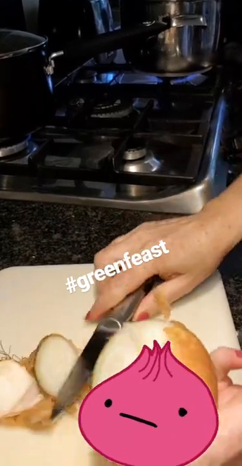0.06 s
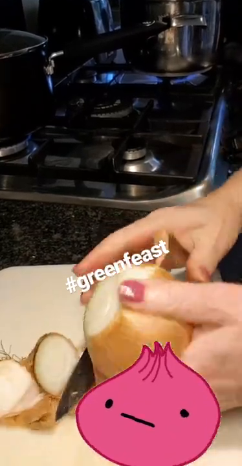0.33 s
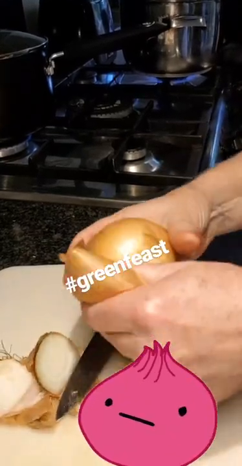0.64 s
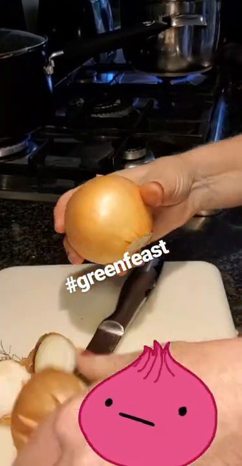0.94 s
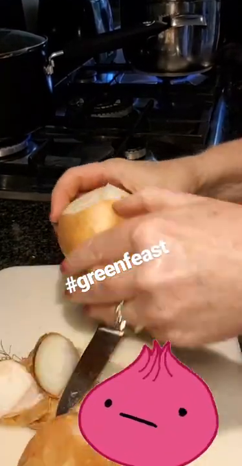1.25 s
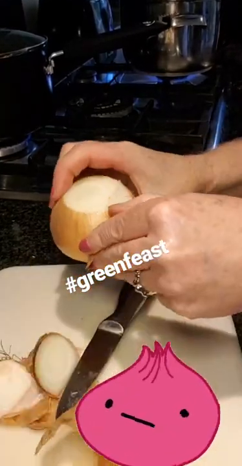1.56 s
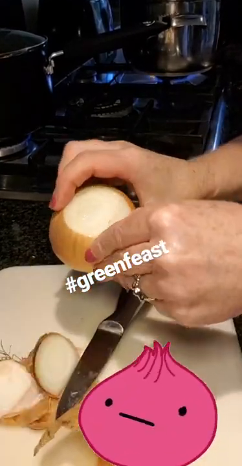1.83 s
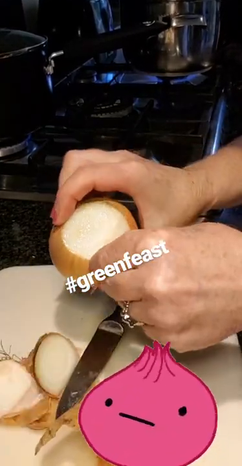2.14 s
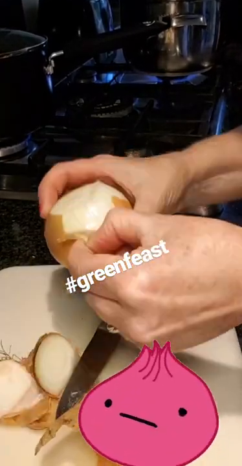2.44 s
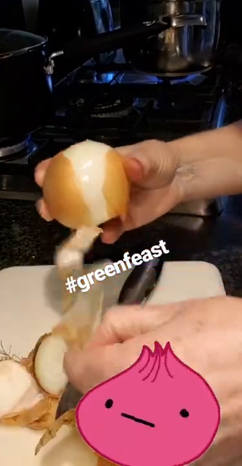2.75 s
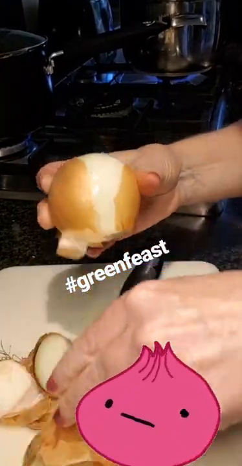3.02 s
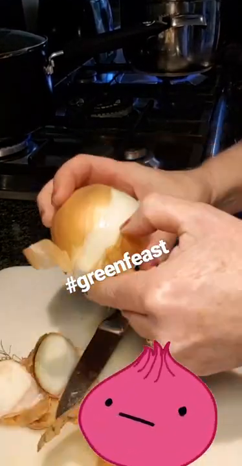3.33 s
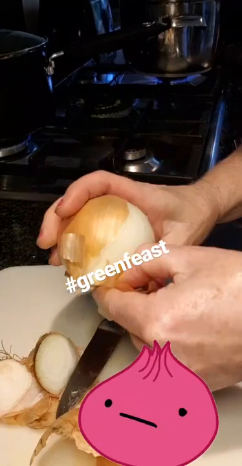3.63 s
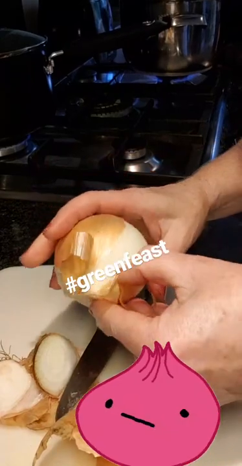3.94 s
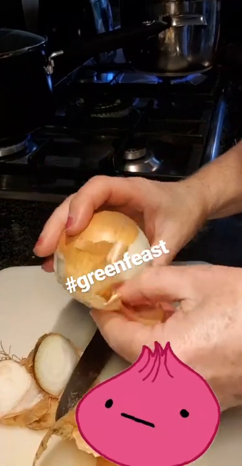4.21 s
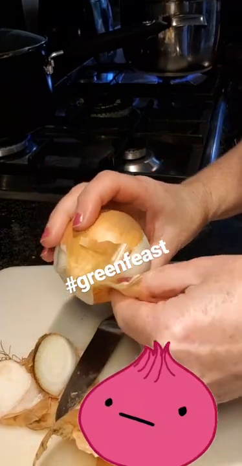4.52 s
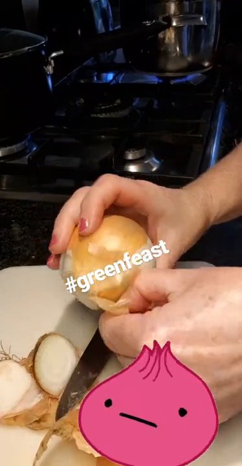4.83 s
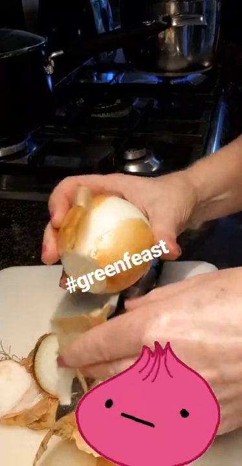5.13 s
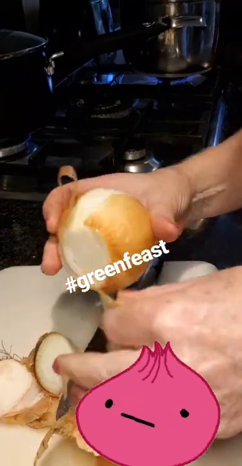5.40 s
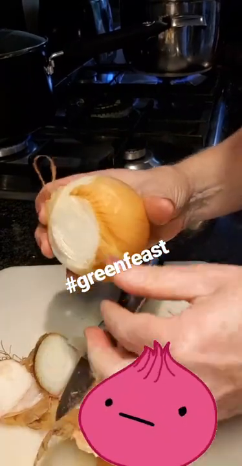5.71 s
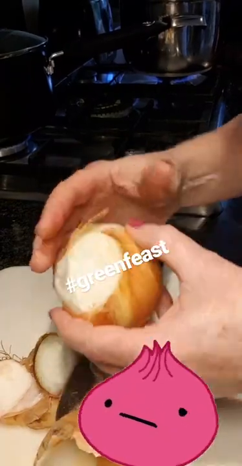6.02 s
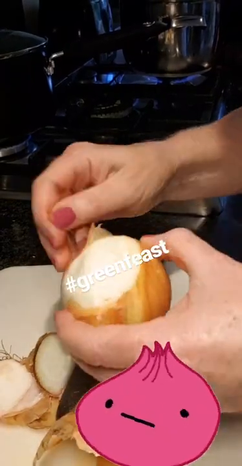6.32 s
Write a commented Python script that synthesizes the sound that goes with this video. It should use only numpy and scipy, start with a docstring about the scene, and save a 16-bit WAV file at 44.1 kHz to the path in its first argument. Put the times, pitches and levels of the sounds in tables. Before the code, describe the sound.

Close to the microphone in a kitchen, a knife knocks once on a chopping board, which rings briefly. Right after, dry onion skin snaps and crinkles under the fingers and a strip tears off. A second strip rips away a little later, followed by scattered crisp crackles. Things clack farther off, echoing in the room, while a faint appliance hum and hiss gradually grow louder.

```python
"""A knife knocks once on a kitchen chopping board, close to a two-port microphone, and the board rings.
Just as near, an onion is peeled: its dry skin snaps, crinkles under the fingers and is torn off in
two strips, fibre by fibre. Things clack farther off in the room, mostly heard as reverberation.
An appliance's steady hum and hiss are heard faintly after the knock, then gradually come up in level."""
import sys
import numpy as np
from scipy import signal
from scipy.fft import rfft, irfft, next_fast_len
from scipy.io import wavfile

SR = 44100
rng = np.random.default_rng(int(sys.argv[2]) if len(sys.argv) > 2 else 0)


def dump_mix(stems):
    """Bounce the given channels to the path in sys.argv[1] as a 16-bit WAV at rate SR."""
    frames = np.atleast_2d(stems).T  # one column per channel
    limited = np.clip(frames, -1, 1)  # hard clip at full scale
    pcm = np.round(limited * 32767).astype(np.int16)
    wavfile.write(sys.argv[1], SR, pcm)


N = 289296


def from_db(db):
    """Decibels to gain."""
    return 10 ** (np.asarray(db) / 20)


def rms_one(x):
    """Scale to rms 1."""
    return x / np.sqrt(np.mean(x ** 2) + 1e-20)


def unit_energy(x):
    """Scale each channel to energy 1."""
    return x / np.sqrt(np.sum(x ** 2, axis=-1, keepdims=True) + 1e-20)


def at_hz(points, hz):
    """Read a table on a log-frequency axis."""
    f, value = np.transpose(points)
    return np.interp(np.log(np.maximum(hz, 1)), np.log(f), value)


def add(out, s, sound):
    """Mix a sound in at s seconds."""
    i = max(int(s * SR), 0)
    out[:, i:i + sound.shape[-1]] += sound[..., :N - i]


def panned(level_db, pan_db):
    """Left and right gains; positive pan_db is to the left."""
    return from_db(level_db + pan_db / 2 * np.array([[1], [-1]]))


def drift(per_s):
    """A smooth random curve of rms 1."""
    knots = rng.standard_normal(int(N / SR * per_s) + 2)
    return rms_one(np.interp(np.arange(N) / SR * per_s, np.arange(len(knots)), knots))


def burst(t60, size=SR // 30):
    """Stereo noise that starts at once and dies."""
    return rng.standard_normal((2, size)) * from_db(-60 * np.arange(size) / SR / t60)


def stroke(start, end, attack_s, release_db_per_s):
    """Gain of one hand movement: attack, hold, release."""
    t = np.arange(N) / SR
    attack = np.clip((t - start) / attack_s, 0, 1)
    return attack * from_db(-release_db_per_s * np.maximum(t - end, 0))


# The microphone's two ports. Each row: frequency in Hz, correlation of left and right.
PORT_LIKENESS = [(60, .99), (290, 0.84), (640, 0.52), (1400, -0.17), (3100, 0.044), (7000, -0.0087),
                 (15000, 0.0043)]

def at_ports(pair, hz):
    """Two unrelated signals become left and right: alike in the bass, apart in the treble."""
    alike = at_hz(PORT_LIKENESS, hz)
    return np.sqrt(1 + alike) * pair[0] + np.sqrt(1 - alike) * pair[1] * [[1], [-1]]


def coloured(pair, spectrum, peaks=()):
    """Give a lasting stereo sound a spectrum and resonances; rms 1."""
    size = next_fast_len(N)
    hz = np.fft.rfftfreq(size, 1 / SR)
    peaks_db = sum(db / (1 + (2 * (hz - centre) / width) ** 2) for centre, width, db in peaks)
    shaped = at_ports(rfft(pair, size), hz) * from_db(at_hz(spectrum, hz) + peaks_db)
    return rms_one(irfft(shaped, size)[:, :N])


def dying_noise(spectrum, t60s, size=SR // 2):
    """Half-octave bands of stereo noise, each dying at its own rate; energy 1."""
    t, out = np.arange(size) / SR, 0
    edges = np.geomspace(125, 17000, 15)
    for low, high in zip(edges, edges[1:]):
        hz = np.sqrt(low * high)
        noise = rng.standard_normal((2, size)) * from_db(-60 * t / at_hz(t60s, hz))
        band = signal.sosfilt(signal.butter(2, [low, high], "band", fs=SR, output="sos"), noise)
        out += unit_energy(at_ports(band, hz)) * from_db(at_hz(spectrum, hz)) * np.sqrt(high - low)
    return unit_energy(out)


def ringing(modes):
    """Struck modes, reaching the two ports a quarter cycle apart; energy 1."""
    t, out = np.arange(SR // 2) / SR, 0
    port_phase = np.array([[0], [np.pi / 2]])
    for hz, db, t60 in modes:
        phase = 2 * np.pi * (hz * t + rng.random()) + port_phase * rng.choice([-1, 1])
        out += from_db(db - 60 * t / t60) * np.sin(phase)
    return unit_energy(out)


def grains(per_s, spread_db, size=N):
    """Fibres break at random moments with very uneven strength, heard differently at each port."""
    breaks = rng.random(size) < per_s / SR
    strength = from_db(spread_db * np.minimum(rng.exponential(1, size), 4))
    return breaks * strength * rng.standard_normal((2, size))


def flake(push, hz, width, bass_cut=0.15):
    """A small stiff piece answers in one broad resonance and radiates little below bass_cut times hz."""
    hz = np.clip(hz, 1000, 14000)
    edges = [hz / (1 + width), min(hz * (1 + width), .47 * SR)]
    resonance = signal.butter(1, edges, "band", fs=SR, output="sos")
    highpass = signal.butter(2, hz * bass_cut, "high", fs=SR, output="sos")
    return unit_energy(signal.sosfilt(highpass, signal.sosfilt(resonance, push)))


def crack(hz):
    """One break of the skin: the smaller the flake, the higher and thinner its tick."""
    return flake(burst(t60=.007), hz, width=.8, bass_cut=(hz / 14000) ** 2)


# The room around the microphone. Each row: frequency in Hz, reverberation time (t60) in seconds.
KITCHEN_T60 = [(200, 0.75), (1000, 0.45), (2500, 0.49), (6000, 0.41), (15000, 0.091)]

def kitchen(direct, worktop_db, room_db):
    """A close sound, its quick scatter off hands and worktop, then the tail of the room."""
    echoes = from_db(room_db) * dying_noise([(1000, 0)], KITCHEN_T60)
    scatter = from_db(worktop_db) * unit_energy(burst(t60=0.054, size=SR // 10))
    add(echoes, 0, scatter)
    return direct + signal.fftconvolve(direct, echoes, axes=1)[:, :N]


# The steady hum and hiss are heard faintly after the knock, then gradually come up in level.
# Each row: time in seconds, relative level in dB.
BACKGROUND_LEVEL = [(0.0, -49), (0.65, -51), (2.5, -48.5), (3.09, -44), (3.86, -44.5), (6.5, -41.5)]
# Motor and mains tones, farther off. Each row: frequency in Hz, relative level in dB.
HUM_TONES = [(48.3, -60), (91, -67), (99.9, -62), (182.5, -61.5), (200, -49), (232.5, -68), (282.4, -51),
             (300, -56), (317.7, -62), (400, -70.5)]
# Air noise, low and high. Each row: frequency in Hz, relative density in dB.
RUMBLE_SPECTRUM = [(20, -31), (42, -30.5), (51, 5.5), (62, 0.5), (72, -16), (125, -15), (175, -11.5),
                   (232, -6.5), (275, -18), (330, -12.5), (410, -35), (505, -12), (620, -27), (1000, -42)]
HISS_SPECTRUM = [(300, 2), (800, -1), (1400, -4), (2200, -13), (3400, -19), (5200, -16), (7300, -7),
                 (9800, -11), (10800, -8), (13100, -10), (15500, -6)]
# Resonances in the hiss. Each row: centre in Hz, width in Hz, boost in dB.
HISS_PEAKS = [(1130, 160, 7), (1730, 280, 12), (4150, 650, 14), (6300, 340, 14), (8130, 500, 10),
              (12200, 330, 9), (13750, 400, 8), (14300, 450, 9), (15050, 550, 13)]

def appliance(hum_db=45, rumble_db=-0.5, hiss_db=-6, waver_db=2.25, wander_rad=0.18, hiss_share=0.73):
    """Motor tones waver a little over rumbling air; the hiss is heard to come up less than the hum."""
    t, hum = np.arange(N) / SR, 0
    heard_db = np.interp(t, *np.transpose(BACKGROUND_LEVEL))
    hiss_heard_db = heard_db.mean() + hiss_share * (heard_db - heard_db.mean())
    for hz, db in HUM_TONES:
        phase = 2 * np.pi * (hz * t + rng.random()) + wander_rad * drift(2.8)
        hum += np.sqrt(2) * from_db(hum_db + db - waver_db * drift(3.2)) * np.sin(phase)
    rumble = from_db(rumble_db) * coloured(rng.standard_normal((2, N)), RUMBLE_SPECTRUM)
    hiss = from_db(hiss_db) * coloured(rng.standard_normal((2, N)), HISS_SPECTRUM, HISS_PEAKS)
    return from_db(heard_db) * (hum + rumble) + from_db(hiss_heard_db) * hiss


# Clacks from across the room. Each row: start in seconds, relative level in dB, swell in seconds.
FAR_CLACKS = [(1.036, -40.5, 0.0098), (1.5685, -42.5, 0.0033), (2.134, -42, 0.0062), (2.9244, -36.5, 0.02),
              (3.207, -35, 0.013), (3.4042, -36.5, 0.013), (3.682, -24.5, 0.0046), (4.8645, -43.5, 0.016),
              (5.384, -45.5, 0.008), (5.5509, -24, 0.019)]
# Their colour at the microphone. Each row: frequency in Hz, relative density in dB.
CLACK_SPECTRUM = [(250, -7.5), (450, -7), (750, -5), (1200, -5), (1900, 4.5), (2900, 0.5), (4500, -4),
                  (7000, -6), (10000, -14.5), (15000, -32)]
# Their ring. Each row: frequency in Hz, relative level in dB, t60 in seconds.
CLACK_MODES = [(1780, -4, .35), (1880, 16, 0.37), (1966, 10, 0.53), (2780, 5, 0.44), (2996, 15, 0.37)]

def clacks(level_db=27, ring_db=-9, direct_db=-15):
    """Far blows from one corner: a weak direct tick, then reverberation that swells and dies."""
    out, t = np.zeros((2, N)), np.arange(SR // 2) / SR
    reverberation = dying_noise(CLACK_SPECTRUM, KITCHEN_T60)
    for s, db, swell_s in FAR_CLACKS:
        tail = reverberation + from_db(ring_db) * ringing(CLACK_MODES)
        add(out, s, from_db(db + level_db) * tail * np.minimum(t / swell_s, 1))
        add(out, s, from_db(db + level_db + direct_db) * flake(burst(t60=0.017), hz=3420, width=0.69))
    return out


# The onion turned in the hand, close up. Each row: start in seconds, length in seconds, level in dB.
RUBS = [(0.0, 0.94, -56), (1.266, 2.5, -64.5), (2.226, 0.15, -58), (5.03, 0.04, -56)]
# Its papery sheet of skin, rubbed or pulled. Each row: frequency in Hz, relative density in dB.
SHEET_SPECTRUM = [(300, -24), (520, -10), (760, -2), (1100, -4), (1600, -4), (2700, -1), (4500, -2),
                  (7000, -13), (15000, -30)]

def rubbing(grip_db=2):
    """Fingertips stick and slip faintly on the papery sheet."""
    pressure = sum(from_db(db) * stroke(s, s + length, attack_s=0.01, release_db_per_s=62)
                   for s, length, db in RUBS)
    grip = from_db(grip_db * drift(12))
    return pressure * grip * coloured(grains(per_s=2500, spread_db=3), SHEET_SPECTRUM)


def ticks(per_s=4, level_db=-29, spread_db=9.5, count=40):
    """Tiny flakes break at chance moments, a little left of the microphone."""
    out = np.zeros((2, N))
    times = np.cumsum(rng.exponential(1 / per_s, count))
    for s, strength in zip(times, rng.standard_normal(count)):
        tick = panned(level_db + spread_db * strength, pan_db=3) * crack(hz=9700)
        if s < N / SR:
            add(out, s, tick)
    return out


# Light taps close by. Each row: start in seconds, relative level in dB, lower and upper ring in Hz.
NAIL_TAPS = [(0.96, -15.5, 1300, 1350), (6.044, -13, 2070, 2760)]

def nail_taps(tick_db=-3, ring_t60=0.015):
    """A nail ticks on something hard, which rings briefly at two pitches, damped by the hand."""
    out = np.zeros((2, N))
    for s, db, low_hz, high_hz in NAIL_TAPS:
        add(out, s, from_db(db + tick_db) * flake(burst(t60=0.025), hz=5500, width=0.27))
        add(out, s, from_db(db) * ringing([(low_hz, 0, ring_t60), (high_hz, 0, ring_t60)]))
    return out


# The knife on the near board, then a light bump. Each row: start in seconds, relative level in dB.
BOARD_BLOWS = [(0.1481, 1.5), (0.5792, -21)]
# The crack of each contact. Each row: frequency in Hz, relative density in dB.
CONTACT_SPECTRUM = [(150, -21.5), (350, -14.5), (520, -12.5), (850, -1), (1300, 5), (2000, -2), (3300, -2),
                    (5500, -8.5), (9000, -15.5), (15000, -27.5)]

def knife(level_db=13, t60=0.018, chatter_gap_s=0.0064, chatter_db=-10.5):
    """Each blow lands twice on the board, tip then handle, and chatters briefly."""
    out = np.zeros((2, N))
    tip, handle = (0, 0), (0.0018, -4)   # delay in seconds, level in dB
    chatter = [(chatter_gap_s * k, chatter_db) for k in range(1, 6)]
    for s, db in BOARD_BLOWS:
        for delay, contact_db in [tip, handle] + chatter:
            contact = dying_noise(CONTACT_SPECTRUM, [(1000, t60)], size=SR // 20)
            add(out, s + delay, from_db(db + contact_db + level_db) * contact)
    return out


# Board and blade at close range. Each row: frequency in Hz, relative level in dB, t60 in seconds.
BOARD_MODES = [(872, 0, .21), (945, -5, .18), (1094, -9, .14), (1210, -3, .15), (1276, -3, .14),
               (1323, -2, .2), (1385, -8, .14), (1700, -12, .2), (1787, -7, .15), (2293, -9, .17),
               (2520, -10, .15), (2700, -10, .15), (2850, -13, .2), (3208, -8, .14), (3941, -18, .18),
               (4527, -18, .17)]

def board(level_db=10):
    """Each blow leaves board and blade ringing, a little to the left."""
    out = np.zeros((2, N))
    for s, db in BOARD_BLOWS:
        add(out, s, panned(db + level_db, pan_db=4) * ringing(BOARD_MODES))
    return out


# Skin folding under the fingers, close up. Each row: start in seconds, relative level in dB, pitch in Hz.
SKIN_CRINKLES = [(0.275, -30.5, 5000), (0.311, -24, 4000), (0.433, -24.5, 2100), (0.448, -24, 3000),
                 (0.758, -33.5, 1900), (1.825, -44, 15000), (2.118, -33.5, 11000), (3.581, -33, 13900),
                 (4.053, -37.5, 11300), (4.706, -32, 14500), (6.121, -37, 13700), (6.21, -33.5, 15000),
                 (6.248, -33.5, 9800)]

def crinkles(level_db=-9, swell_s=0.019):
    """A fold gives way in a flurry of tiny breaks that swells and fades."""
    out, t = np.zeros((2, N)), np.arange(SR // 6) / SR
    age = 4 * t / swell_s
    for s, db, hz in SKIN_CRINKLES:
        flurry = grains(per_s=3000, spread_db=4, size=len(t)) * age ** 2 * np.exp(-age)
        fold = flake(flurry, hz, width=0.35, bass_cut=0.27)
        add(out, s, from_db(db + level_db) * np.sqrt(swell_s * SR) * fold)
    return out


# Two strips torn off, close up. Each row: times of grip, free tear and letting go in seconds,
# sheet and fibre levels in dB, swell while tearing and release in dB per second, tilt in dB per octave.
STRIP_PULLS = [(0.396, 0.586, 0.68, -40.5, -34, -33, 114, 3),
               (2.366, 2.568, 2.726, -45.5, -33, 15, 550, 5.5)]
# The main resonance of each strip. Each row: centre in Hz, width in Hz, boost in dB.
STRIP_RESONANCES = [(2080, 2200, 9.5), (2850, 390, 5)]
# Parting fibres, before the tilt. Each row: frequency in Hz, relative density in dB.
FIBRE_SPECTRUM = [(1500, -25), (3500, -9), (4800, -1), (7000, -2), (10000, 0), (14000, 1), (16000, -3)]

def tearing(build_db=17, sheet_follows=0.3, grip_s=0.016):
    """Fibres part by the thousand and shake the loose sheet; the pull builds, catches, slips, lets go."""
    out, t = np.zeros((2, N)), np.arange(N) / SR
    for pull, resonance in zip(STRIP_PULLS, STRIP_RESONANCES):
        grip, free, end, sheet_db, fibre_db, swell, release, tilt = pull
        effort_db = np.interp(t, [grip, free], [-build_db, 0])
        torn_s = np.clip(t, free, end) - free
        held = stroke(grip, end, grip_s, release) * from_db(swell * torn_s)
        breaks = grains(per_s=5000, spread_db=2.8) * from_db(2 * drift(110))   # catch and slip
        sheet = coloured(breaks, SHEET_SPECTRUM, [resonance])
        fibres = coloured(breaks, [(hz, db + tilt * np.log2(hz)) for hz, db in FIBRE_SPECTRUM])
        out += held * from_db(sheet_db + sheet_follows * effort_db) * sheet
        out += held * from_db(fibre_db + effort_db) * fibres
    return out


# The loud breaks of the skin, right at the microphone.
# Each row: start in seconds, relative level in dB, centre in Hz, left minus right in dB.
SKIN_SNAPS = [(0.2955, -23.5, 7940, -2), (0.3208, -24.5, 8100, 2), (0.3886, -32.5, 6350, 2),
              (0.4054, -34, 8000, 3), (0.4489, -26.5, 5600, 4), (0.4806, -31.5, 8900, 1),
              (0.5203, -27, 11000, 2), (0.5803, -29, 5050, 7), (0.842, -32.5, 7500, 1),
              (2.1303, -43, 8500, 0), (1.9192, -41, 12200, 2), (1.987, -38.5, 11000, 2),
              (2.2493, -32, 12400, -3), (2.256, -24, 11800, 16), (2.2582, -23, 11900, -15),
              (2.336, -30, 10200, -5), (2.3563, -34, 10400, -3), (2.4043, -18.5, 7900, 2),
              (3.4928, -36, 8060, 6), (3.629, -40.5, 12200, 6), (4.7184, -33.5, 11000, 6),
              (4.736, -32.5, 10400, 3), (4.8362, -27, 12000, 0), (4.8436, -27.5, 10200, 2),
              (6.361, -34.5, 11700, 5)]

def snaps(level_db=23, shake_db=11.5, shake_db_per_octave=20.5, run_on_s=0.011, run_on_db=-13):
    """A crack runs through dry skin in milliseconds, shakes the sheet around it and runs on weakly."""
    out = np.zeros((2, N))
    for s, db, hz, pan_db in SKIN_SNAPS:
        add(out, s, panned(db + level_db, pan_db) * crack(hz))
        # a larger, lower flake shakes the sheet harder
        sheet_db = db + shake_db + shake_db_per_octave * np.log2(8000 / hz)
        add(out, s, from_db(sheet_db) * flake(burst(t60=0.025), hz=1900, width=2.5))
        delay = run_on_s * (.5 + rng.random())
        add(out, s + delay, panned(db + level_db + run_on_db, pan_db) * crack(hz))
    return out


def scene():
    """Board and onion close to the microphone, clacks and appliance farther off."""
    knock = kitchen(knife(), worktop_db=-6, room_db=-10.5) + board()
    skin = snaps() + ticks() + nail_taps() + crinkles() + tearing()
    peeling = kitchen(skin, worktop_db=-5.5, room_db=-6) + rubbing()
    return knock + peeling + clacks() + appliance()


def record(dry):
    """The recorder rounds the loudest peaks and cuts the top above 15650 Hz."""
    lowpass = signal.ellip(10, .2, 80, 15650, fs=SR, output="sos")
    return signal.sosfilt(lowpass, np.tanh(dry))


dry = scene()
out = record(dry)
dump_mix(out)
```